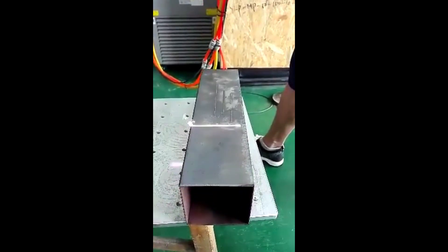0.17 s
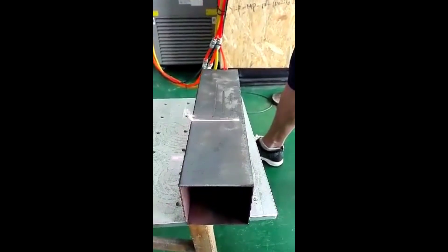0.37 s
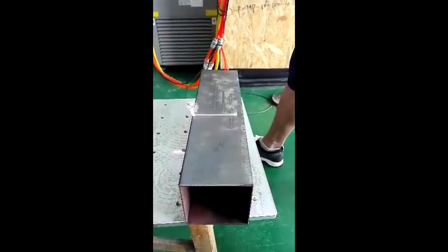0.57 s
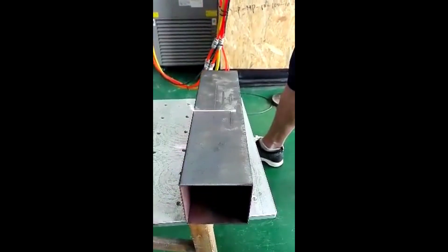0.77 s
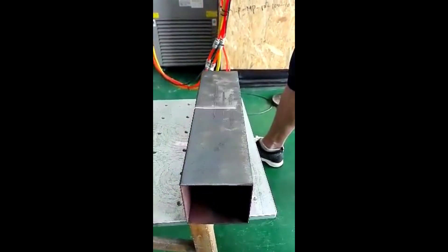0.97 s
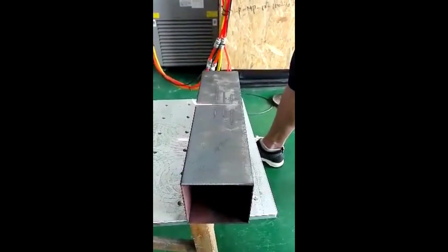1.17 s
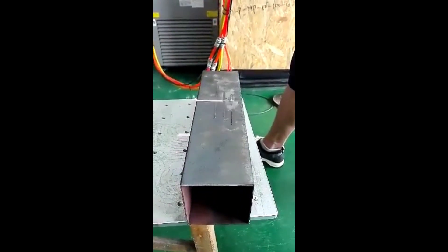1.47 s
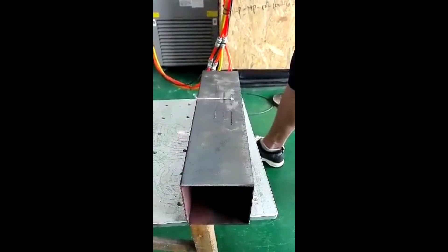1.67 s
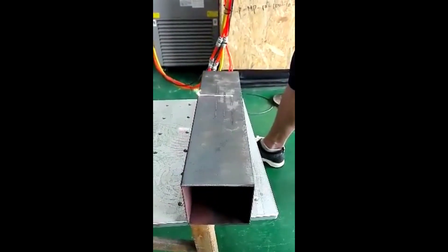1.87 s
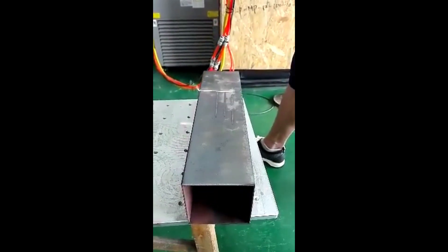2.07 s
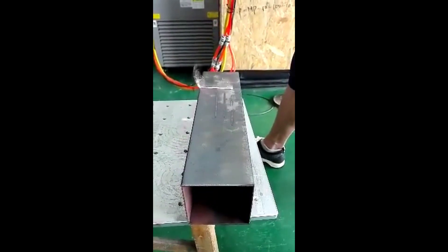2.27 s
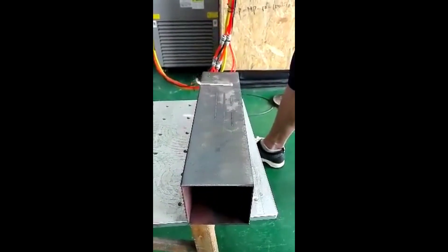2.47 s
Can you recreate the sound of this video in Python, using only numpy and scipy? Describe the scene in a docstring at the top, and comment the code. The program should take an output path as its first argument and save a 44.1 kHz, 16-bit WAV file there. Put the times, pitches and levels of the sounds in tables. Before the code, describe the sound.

Raspy electric laser buzz with bright sizzle and sparking snaps, a fan humming steadily behind it

```python
"""In a workshop, a pulsed cleaning laser sweeps a line to and fro over a steel tube; a chiller fan hums behind.
Each pulse pops on the rust: the pop strength is heard directly as crackle, and modulates the pulse rate as sizzle.
It follows the surface under the beam, so it partly repeats every sweep. The beam flashes at the tube's edges,
excites a ring in the tube's wall and throws sparks; the fan is filtered noise with two resonant hums.
There are two microphones, the left one facing the work."""
import sys
import numpy as np
from scipy import signal
from scipy.fft import rfft, irfft, next_fast_len
from scipy.io import wavfile
from scipy.ndimage import uniform_filter1d

SR = 44100
rng = np.random.default_rng(int(sys.argv[2]) if len(sys.argv) > 2 else 0)


def materialize(psi):
    """Save the field psi as 16-bit PCM at rate SR to the path in sys.argv[1].

    A 1-D psi becomes a single channel; in a 2-D psi each row is a channel.
    """
    bounded = np.clip(np.atleast_2d(psi).T, -1, 1)
    quanta = np.round(bounded * 32767).astype(np.int16)
    wavfile.write(sys.argv[1], SR, quanta)


def linear_from_db(decibels):
    """Turn decibels (scalar or array-like) into linear amplitude factors; 0 gives 1."""
    return 10 ** (np.asarray(decibels, float) / 20)


N = 115542
TIME = np.arange(N) / SR   # s
PULSE_HZ, SWEEP_HZ = 13994.5, 94.72
SIDES = np.array([[1], [-1]])   # signs of a left-right difference


def rms_one(x):
    """Normalisation to unit root-mean-square."""
    return x / np.sqrt(np.mean(x ** 2, axis=-1, keepdims=True) + 1e-20)


def in_time(rows):
    """Linear interpolation of a table's columns over time."""
    s, *columns = np.transpose(rows)
    return [np.interp(TIME, s, column) for column in columns]


def at_hz(points, hz):
    """Interpolation of a spectrum along log frequency."""
    table_hz, values = np.transpose(points)
    return np.interp(np.log(hz + 1), np.log(table_hz), values)


def shaped(x, gain):
    """Linear filtering: the spectrum is multiplied by a gain given as a function of Hz."""
    size = next_fast_len(N)
    hz = np.arange(size // 2 + 1) * SR / size
    return irfft(rfft(x, size) * gain(hz), size)[..., :N]


def drift(rate_hz):
    """Slow random modulation of unit rms: noise through a two-pole low-pass, computed every 40 samples."""
    r = np.exp(-2 * np.pi * rate_hz * 40 / SR)
    noise = rng.standard_normal(N // 40 + 2002)
    slow = signal.lfilter([1], [1, -2 * r, r * r], noise)[2000:]
    return np.interp(np.arange(N) / 40, np.arange(len(slow)), rms_one(slow))


def resonator(hz, width_hz):
    """Damped resonance: a pole pair whose radius sets the bandwidth."""
    r = np.exp(-np.pi * width_hz / SR)
    zeros = np.array([1, 0, -1]) * (1 - r * r) / 2
    poles = [1, -2 * r * np.cos(2 * np.pi * hz / SR), r * r]
    return zeros, poles


def resonance(x, hz, width_hz):
    """Forced response of a damped resonance of fixed centre."""
    return signal.lfilter(*resonator(hz, width_hz), x)


def gliding_resonance(x, hz, width_hz, size=512):
    """Resonance of moving centre, reset block by block while its stored state carries over."""
    out, state = np.zeros_like(x), np.zeros((len(x), 2))
    for i in range(0, N, size):
        zeros, poles = resonator(hz[i], width_hz)
        out[:, i:i + size], state = signal.lfilter(zeros, poles, x[:, i:i + size], zi=state)
    return out


def hum(noise, hz, width_hz):
    """Resonant selection: noise passes twice through a resonance, its level evened out over 30 ms."""
    x = resonance(resonance(noise, hz, width_hz), hz, width_hz)
    power = uniform_filter1d(rms_one(x) ** 2, int(.03 * SR))
    return x / np.sqrt(power + .15) / np.std(x)


def fan_air():
    """Broadband flow noise, alike on both sides in the lows, varying in the mids, opposite in the highs."""
    # spectrum of the air noise: (frequency [Hz], relative density [dB per Hz])
    spectrum = [(12, -60), (20, -10.5), (70, -14), (108, -6.5), (140, -8.5), (176, -10), (264, -13),
                (293, -16), (324, -16), (378, -18.5), (569, -23), (664, -20), (1540, -19), (1750, -19),
                (3000, -20.5), (9000, -48.5), (11700, -79), (19800, -120)]
    # correlation of left and right, clipped to -1..1: (frequency [Hz], likeness [1])
    likeness = [(60, 0.93), (130, 1), (290, 0.8), (640, -0.43), (1400, 0.34), (3070, -0.17), (6730, -1.05),
                (14800, -0.95)]
    # balance of the air noise: (frequency [Hz], left-right difference [dB])
    balance = [(300, -0.5), (700, 2), (2000, -2.5), (3500, 3), (5000, 22), (7000, 7)]
    level_db = -29   # before the balance
    alike = lambda hz: np.clip(at_hz(likeness, hz), -1, 1)
    mid, side = rng.standard_normal((2, N))
    mid = shaped(mid, lambda hz: linear_from_db(at_hz(spectrum, hz)) * np.sqrt(1 + alike(hz)))
    side = shaped(side, lambda hz: linear_from_db(at_hz(spectrum, hz)) * np.sqrt(1 - alike(hz)))
    air = rms_one(np.array([mid + side, mid - side]))
    return linear_from_db(level_db) * shaped(air, lambda hz: linear_from_db(SIDES / 2 * at_hz(balance, hz)))


def fan_hums():
    """Two fan resonances excited by one noise, so the hollow hums are the same on both sides."""
    # lower resonance: (centre [Hz], width [Hz], relative level [dB])
    lower = (111.5, 11, -42)
    # upper resonance: (centre [Hz], width [Hz], level above its swell [dB])
    upper = (158.2, 48.4, -1.7)
    # swelling of the upper hum: (time [s], relative level [dB])
    swell = [(0.0, -35.5), (0.72, -40), (0.81, -24.5), (0.83, -40.5), (1.01, -30.5), (1.31, -44),
             (1.33, -29.5), (1.55, -41), (1.58, -31), (1.82, -53), (1.86, -31.5), (2.04, -37),
             (2.08, -27.5), (2.11, -45), (2.22, -31.5), (2.26, -46), (2.31, -33.5), (2.35, -42),
             (2.38, -41), (2.62, -36)]
    surge_db = .8   # rms wander of the lower hum
    noise = rng.standard_normal(N)
    changes_db = surge_db * drift(3.9), in_time(swell)[0]
    return sum(linear_from_db(db + change_db) * hum(noise, hz, width_hz)
               for (hz, width_hz, db), change_db in zip((lower, upper), changes_db))


def fan():
    """Superposition of flow noise and resonant hums."""
    return fan_air() + fan_hums()


def sweep_tones():
    """Harmonics of a periodic motion: faint pure lines on multiples of the sweep rate."""
    # the lines: (multiple of the sweep rate [1], relative level [dB])
    overtones = [(8.0, -9), (9.0, 0)]
    # their common level: (time [s], relative level [dB])
    common = [(0, -62), (1.0, -60), (1.07, -54), (1.15, -62), (2.05, -54), (2.15, -49), (2.3, -59),
              (2.45, -50), (2.62, -46)]
    level_db, = in_time(common)
    out = np.zeros((2, N))
    for multiple, db in overtones:
        turns = multiple * SWEEP_HZ * TIME + rng.random((2, 1))   # random phase on each side
        out += linear_from_db(level_db + db) * np.sqrt(2) * np.sin(2 * np.pi * turns)
    return out


def whistle():
    """Carrier of the pulse train: the mean pulse strength gives a thin wavering tone at the pulse rate."""
    # course of the tone: (time [s], relative level [dB])
    course = [(0.0, -38.5), (0.15, -36.5), (0.58, -41), (0.6, -49), (0.81, -37), (0.87, -42), (1.6, -46.5),
              (1.72, -49), (1.8, -38.5), (2.36, -41), (2.56, -35), (2.62, -47)]
    flicker_db, wander_rad = 2.5, 2.5   # rms
    level_db, = in_time(course)
    out = []
    for side_db in (0, -15.5):   # left, right
        strength = linear_from_db(level_db + 8 + side_db + flicker_db * drift(25))
        out.append(strength * np.cos(2 * np.pi * PULSE_HZ * TIME + wander_rad * drift(2.6)))
    return np.array(out)


def sparks():
    """Impulsive radiation where the beam meets thick scale: brief bright noise with a rapid rise."""
    # the bursts: (time of peak [s], relative level [dB], left-right difference [dB])
    bursts = [(.2313, -22, 8), (.2416, -9, 16), (.2523, -11, 15), (.2629, -16, 7), (.5268, -10, 12),
              (.5373, -18, 13), (1.5085, -13, 15), (1.7588, -21, 13), (1.7836, -22, 3), (1.7938, -20, 4),
              (1.8254, -16, 2), (1.8993, -21, 6), (1.9112, -9, -2), (2.522, -15, 12), (2.5748, -24, 4),
              (2.5854, -5, -3)]
    # spectrum of a burst: (frequency [Hz], relative level [dB])
    spectrum = [(2000, -2), (5000, -5), (8000, -6.5), (12000, -13), (14300, 6), (14600, -22), (16000, -40)]
    decay_s, gain_db, low_hz = .00093, -11, 2600
    envelope = np.zeros((2, N))
    for s, db, pan_db in bursts:
        age = (TIME - s) / decay_s
        rise_and_decay = np.exp(-np.abs(age) * np.where(age > 0, 1, 2))   # rises twice as fast
        envelope += linear_from_db(db + gain_db + pan_db / 2 * SIDES) * rise_and_decay
    colour = lambda hz: linear_from_db(at_hz(spectrum, hz)) / (1 + (low_hz / (hz + 1)) ** 4)
    return shaped(envelope * rng.standard_normal((2, N)), colour)


def surface():
    """Periodic scanning of a random surface: a slowly renewed repeating pattern plus fresh chance."""
    # part of the strength's power that repeats each sweep: (frequency [Hz], share [1])
    repeats = [(300, 0.49), (2500, 0.46), (4500, 0.15), (7000, 0.022)]
    memory = .94   # share of the pattern kept from one sweep to the next
    throb_db, throb_s = 2.0, .0089   # swing either way; peak after the sweep's start, near the edges
    share = lambda hz: at_hz(repeats, hz)
    below = lambda hz: hz < PULSE_HZ / 2   # pulses sample the surface only up to half their rate
    # feedback over one sweep period
    comb = lambda hz: np.sqrt(1 - memory ** 2) / (1 - memory * np.exp(-2j * np.pi * hz / SWEEP_HZ))
    old = shaped(rng.standard_normal((2, N)), lambda hz: below(hz) * np.sqrt(share(hz)) * comb(hz))
    new = shaped(rng.standard_normal((2, N)), lambda hz: below(hz) * np.sqrt(1 - share(hz)))
    throb = linear_from_db(throb_db * np.cos(2 * np.pi * SWEEP_HZ * (TIME - throb_s)))
    return rms_one((old + new) * throb)


def flashes():
    """Transient excitation at edge crossings, once a sweep each: a resonant crack and a burst of pulses."""
    # crossings as heard: (microphone [0 left, 1 right], first place in the sweep [ms], last place [ms])
    edges = [(0, 9.78, 9.45), (0, 7.7, 6.8), (1, 9.95, 9.65), (1, 7.7, 7.15), (1, 9.3, 8.35)]
    # sound of each crossing: (resonance [Hz], relative crack level [dB], relative sizzle level [dB])
    sounds = [(4260, 10, 3.5), (2840, 3.5, -1), (3100, 8.5, -16), (2530, -3, 1), (2500, 4, 18.5)]
    # strength of all flashes: (time [s], relative level [dB])
    course = [(0, 2.5), (.2, -1.5), (.35, 0.5), (.55, 1), (.7, -6.5), (.9, -3.5), (1.1, -1.5), (1.3, -2),
              (1.45, 1.5), (1.65, -10), (1.8, 1), (1.93, -1), (2.1, -4), (2.3, 1), (2.55, -1.5),
              (2.62, 2.5)]
    burst_s, crack_s, crack_q = .00005, .00009, 1.57   # Gaussian spread, twice the Gaussian spread, Q
    spread_db, slow_db = 1.7, 1.0   # rms change from sweep to sweep, and slowly
    crack, burst = np.zeros((2, 2, N))
    flash_db, = in_time(course)
    for (mic, first_ms, last_ms), (hz, crack_db, sizzle_db) in zip(edges, sounds):
        # the crossing moves within the sweep as the line moves along the tube
        place_s = (first_ms + (last_ms - first_ms) * TIME / TIME[-1]) / 1000
        turns = (TIME - place_s) * SWEEP_HZ
        nearest = np.round(turns)
        age_s = (turns - nearest) / SWEEP_HZ
        each_sweep = linear_from_db(spread_db * rng.standard_normal(300))[nearest.astype(int) + 2]
        strength = each_sweep * linear_from_db(flash_db + slow_db * drift(3))
        spike = strength * np.exp(-.5 * (age_s / burst_s) ** 2)
        sharp = np.diff(strength * np.exp(-2 * (age_s / crack_s) ** 2), prepend=0)
        crack[mic] += linear_from_db(crack_db + 19.5) * resonance(sharp, hz, hz / crack_q)
        burst[mic] += linear_from_db(sizzle_db) * spike
    return crack, burst


def tube_ring(strength, crack):
    """Wall resonance of the tube, excited by pops and cracks; its centre shifts as the line moves along."""
    # course of the ring: (time [s], centre [Hz])
    centre = [(0.01, 4800), (.6, 4700), (1.05, 4320), (1.5, 4550), (1.85, 4660), (2.25, 4620), (2.42, 4770),
              (2.6, 4800)]
    excitation = .6 * strength + 3 * crack
    return gliding_resonance(excitation, *in_time(centre), width_hz=186)


def laser():
    """Amplitude modulation of a pulse train: the strength is the crackle, its sidebands the sizzle."""
    # bite of the beam: (time [s], relative sizzle level [dB], crackle above sizzle [dB],
    # left-right difference [dB], relative level of the tube's ring against the sizzle [dB])
    bite = [(0.0, -50, 4.5, 3, -10), (0.15, -38, -1, 3.5, -20), (0.2, -43, 1.5, 0.5, -19),
            (0.24, -34.5, -1.5, 3, 8), (0.29, -40.5, 1, -0.5, 5), (0.31, -38.5, -0.5, 2.5, -17),
            (0.35, -41, 1.5, 6, -12), (0.57, -36, 0.5, 3, -8), (0.63, -41, 1.5, 2.5, -27),
            (0.81, -39.5, 0, 2, -24), (0.89, -47, 1.5, -1, -15), (0.96, -51, 1, -2, 1),
            (1.02, -38.5, 1, 1.5, 16), (1.33, -43, 0, 2, -31), (1.52, -39, 0.5, 4.5, -25),
            (1.62, -44, 2.5, 0.5, -12), (1.69, -48, 2, 2, -2), (1.74, -46.5, 1.5, 0, -5),
            (1.78, -38, 0.5, 1.5, -3), (1.95, -38, 1.5, 0.5, 14), (1.98, -45, -0.5, -2.5, -28),
            (2.2, -39.5, 2.5, 2.5, -5), (2.22, -39.5, 1.5, 2, 12.5), (2.56, -33.5, 0, 2.5, 12),
            (2.62, -36, 1.5, 6.5, 8)]
    # colour of the pops at the left microphone: (frequency [Hz], relative density [dB per Hz])
    left = [(500, -2), (1200, -4.5), (2500, 8), (4800, 3.5), (6000, 2), (7800, -3), (9500, -2.5),
            (12000, 1.5), (13500, 5.5), (13900, 8), (14200, 5), (14400, -26)]
    # colour of the pops at the right microphone: (frequency [Hz], relative density [dB per Hz])
    right = [(500, -7.5), (1200, 3), (2500, 10), (4200, 7), (5200, -1), (6200, -32), (7200, -3),
             (8600, -24), (10500, -11), (13000, -3.5), (14200, 1), (14400, -27)]
    ring_sides_db = np.array([[-9.5], [-21.5]])   # left, right
    wander_rad, flicker_db = .9, .6   # rms
    sizzle_db, crackle_db, pan_db, ring_db = in_time(bite)
    pulses = 2 * np.cos(2 * np.pi * PULSE_HZ * TIME + wander_rad * drift(12))
    strength = surface()
    crack, burst = flashes()
    colour = lambda hz: linear_from_db(np.array([at_hz(left, hz), at_hz(right, hz)]))
    crackle = linear_from_db(crackle_db) * (shaped(strength, colour) + crack)
    ring = linear_from_db(ring_db + ring_sides_db) * tube_ring(strength, crack)
    sizzle = shaped((strength + 1.24 * burst) * pulses, colour)
    level = linear_from_db(sizzle_db + 4 + flicker_db * drift(20) + pan_db / 2 * SIDES)
    return level * (crackle + ring + sizzle)


def patchy(x):
    """Independent band modulation: eighth-octave bands from 4 to 13.5 kHz swell and fade each on their own."""
    edges_hz = 4000 * 2 ** np.arange(0, 1.85, 1 / 8)
    out = x.copy()
    for low, high in zip(edges_hz, edges_hz[1:]):
        band = shaped(x, lambda hz: (hz >= low) & (hz < high))
        out += (linear_from_db(2.4 * drift(12)) - 1) * band   # 2.4 dB rms
    return out


def scene():
    """Linear superposition of all sources at the two microphones."""
    return fan() + sweep_tones() + whistle() + sparks() + patchy(laser())


def roll_off(x):
    """The treble ends steeply here."""
    return signal.sosfilt(signal.butter(12, 15390, fs=SR, output="sos"), x)


def record(dry):
    """Band limitation: a steep low-pass, 60 dB down from 14750 Hz, then a small constant offset."""
    low_pass = signal.cheby2(20, 60, 14750, fs=SR, output="sos")
    mix = signal.sosfilt(low_pass, dry) - .0023
    return roll_off(mix)


dry = scene()
out = record(dry)
materialize(out)
```